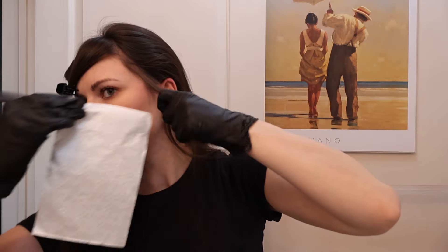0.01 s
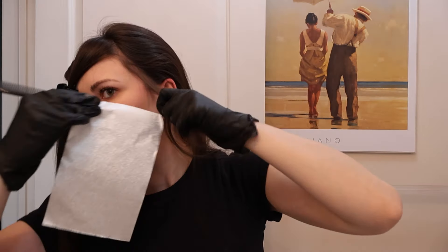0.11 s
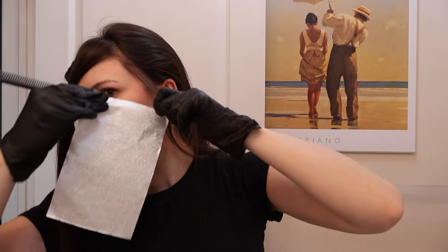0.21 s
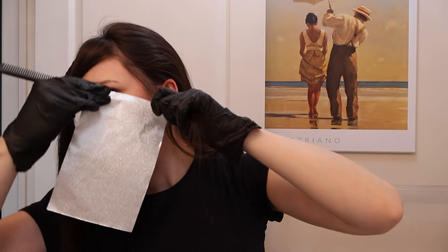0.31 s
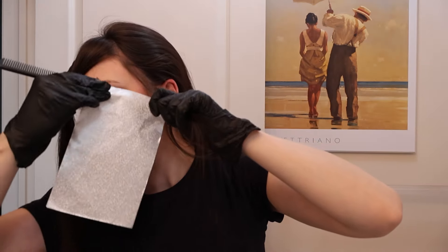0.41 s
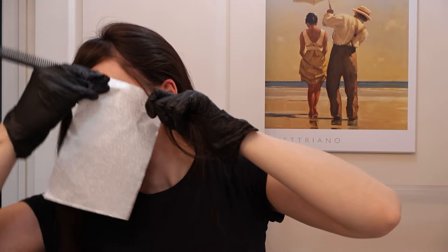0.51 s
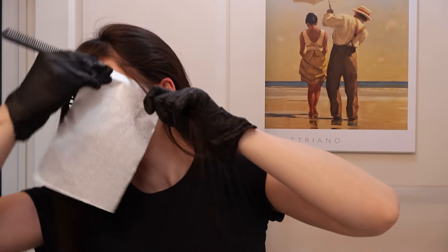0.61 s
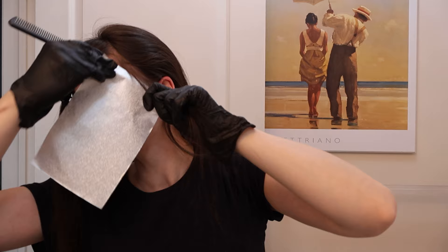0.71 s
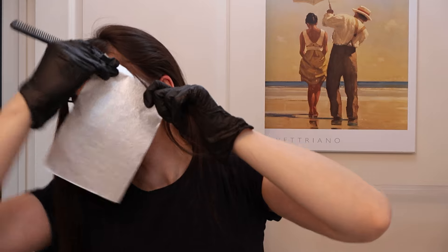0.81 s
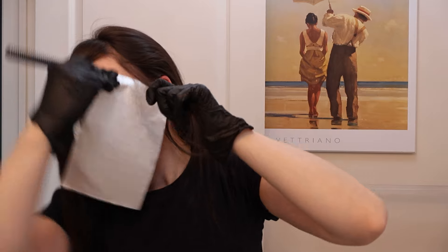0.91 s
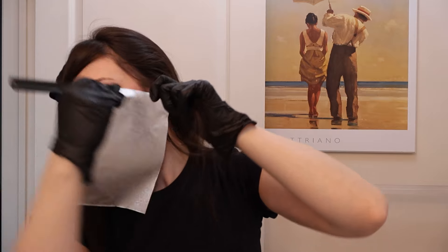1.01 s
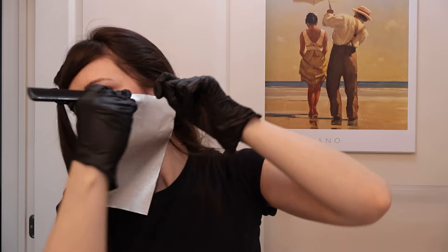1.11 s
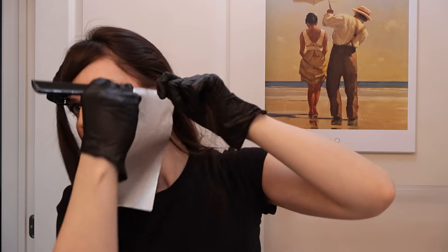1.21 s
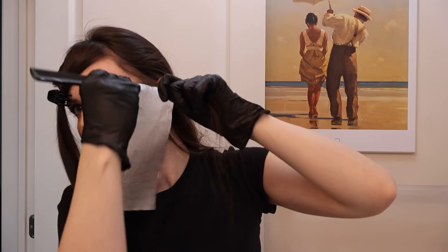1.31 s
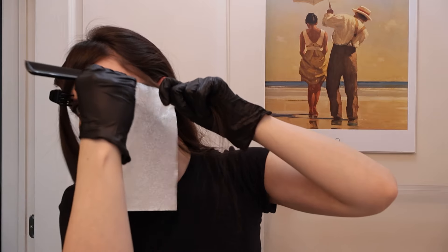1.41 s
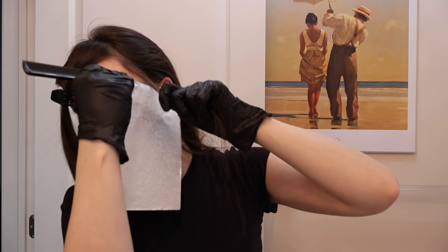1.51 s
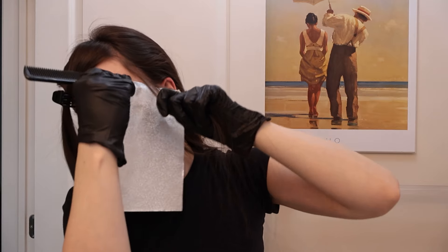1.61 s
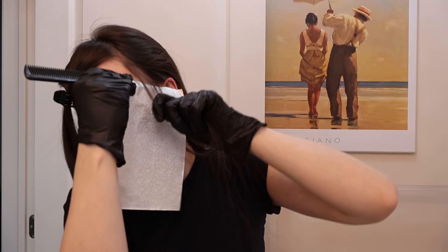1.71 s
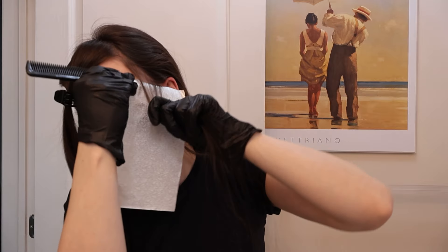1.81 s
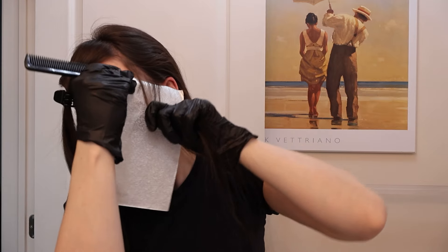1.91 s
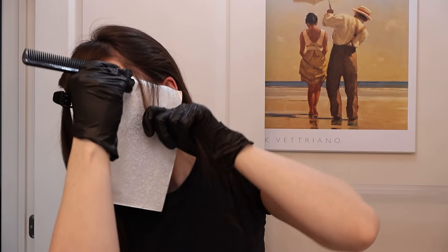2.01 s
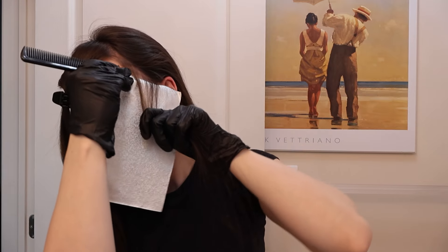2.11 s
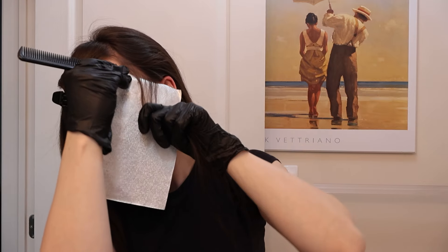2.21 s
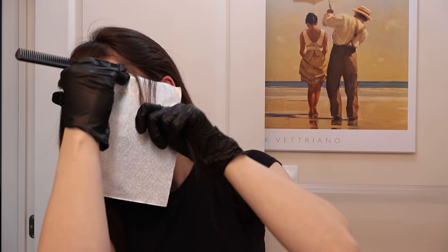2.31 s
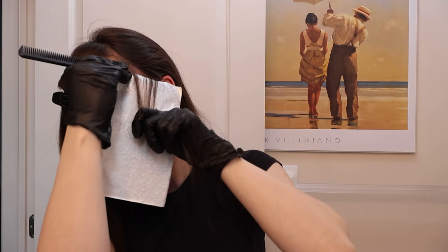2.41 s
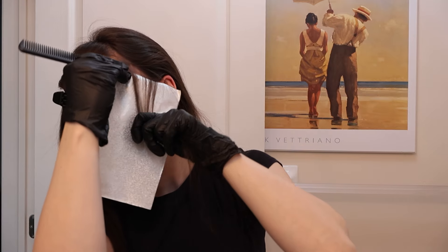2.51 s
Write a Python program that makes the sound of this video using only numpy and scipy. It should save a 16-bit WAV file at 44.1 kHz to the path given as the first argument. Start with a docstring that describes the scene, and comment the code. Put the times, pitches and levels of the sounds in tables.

```python
"""A small bathroom: gloved hands hold a sheet of aluminium foil against the hair, close to a stereo microphone.
Hair, comb and gloves slide over it in hissing strokes and rasps made of tiny random slips. The sheet
crumples in runs of coarser clicks, buckles with sharp pops, ticks under the comb and flaps in low puffs.
Clicks excite the decaying modes of the sheet; hard walls ring briefly around a central sound, over room
tone of filtered noise, widest in the bass, and a low hum."""
import sys
import numpy as np
from scipy import signal
from scipy.fft import rfft, irfft
from scipy.io import wavfile

SR = 44100
rng = np.random.default_rng(int(sys.argv[2]) if len(sys.argv) > 2 else 0)


def master_out(mix):
    """Clip the mix to full scale and print it as 16-bit PCM to the path in sys.argv[1]."""
    frames = np.transpose(np.atleast_2d(mix))
    ceiling = np.clip(frames, -1, 1)
    pcm = np.round(ceiling * 32767).astype(np.int16)
    wavfile.write(sys.argv[1], SR, pcm)


N = 114660  # samples
TIME_S = np.arange(N) / SR
OCTAVES = np.log2(np.maximum(np.arange(N + 1) * SR / (2 * N), 1))  # filter frequency axis, above 1 Hz
TOP_HZ = 15750  # upper limit of the recorder
SLIPS_PER_S, SLIP_SCATTER_DB = 9000, -0.5
CATCH_PER_S, CATCH_DB = 260, 1.8  # slips cluster: rate and depth of their level changes


def undb(db):
    """Decibels to gain."""
    return 10 ** (np.asarray(db) / 20)


def unit(x):
    """Scale to rms 1."""
    return x / np.sqrt(np.mean(x ** 2))


def curve(points):
    """Join (Hz, value) points on the octave axis."""
    hz, value = np.array(points, float).T
    return np.interp(OCTAVES, np.log2(hz), value)


HUMP_SKIRT_DB = 22
TOP_LOSS_DB = 6.5  # per octave, from one octave above the peak


def hump(hz, spread_octaves):
    """A spectral peak in dB with sloping skirts and extra loss in the treble."""
    above = OCTAVES - np.log2(hz)
    skirt = -HUMP_SKIRT_DB * np.log10(1 + (above / spread_octaves) ** 2)
    return skirt - TOP_LOSS_DB * np.maximum(above - 1, 0)


def colour(x, db):
    """Causal (minimum-phase) filter of unit power with the given dB shape."""
    cepstrum = irfft(np.log(unit(undb(db))))
    # Folding the cepstrum onto positive time makes the filter causal.
    cepstrum[1:N] *= 2
    cepstrum[N + 1:] = 0
    response = np.exp(rfft(cepstrum))
    return irfft(rfft(x, 2 * N) * response)[:N]


def walk(per_s):
    """Random values joined by straight lines, spread near 1."""
    at = TIME_S * per_s
    count = int(at[-1]) + 2
    return 1.2 * np.interp(at, np.arange(count), rng.standard_normal(count))


def grains(per_s, scatter_db):
    """Random tiny clicks of uneven size and either sign, rms 1."""
    size = undb(scatter_db * np.minimum(rng.exponential(size=N), 4))
    happens = rng.random(N) < per_s / SR
    return unit(happens * np.sign(rng.standard_normal(N)) * size)


def catching_slips():
    """Stick-slip clicks whose level wanders, so that they catch in clusters."""
    return unit(grains(SLIPS_PER_S, SLIP_SCATTER_DB) * undb(CATCH_DB * walk(CATCH_PER_S)))


TILT_FROM_HZ = 280  # brightness acts above this


def bouts(rows, clicks, shape):
    """Each movement swells, holds and dies away by 20 dB per release time, with its own brightness."""
    out = 0
    tilt_octaves = np.maximum(OCTAVES, np.log2(TILT_FROM_HZ))
    for start, rise, hold, release, db, tilt in rows:
        swell = np.clip((TIME_S - start) / max(rise, 1e-3), 0, 1) ** 0.78
        since_hold = np.maximum(TIME_S - start - rise - hold, 0)
        fade = 10 ** (-since_hold / max(release, 1e-3))
        out = out + undb(db) * colour(clicks * swell * fade, shape + tilt * tilt_octaves)
    return out


# Modes of the foil sheet: pitch_hz [Hz], level_db [dB, before the drive level], t60_s [s to fall 60 dB]
SHEET_MODES = [(700, 2.5, 0.063), (807, -3, 0.074), (1185, -6.5, 0.089), (1375, 0, 0.046),
               (1830, -4.5, 0.23), (2160, -5, 0.044), (2390, -1, 0.092), (2730, 5, .11), (2900, 6.5, 0.084),
               (3300, -4, 0.093), (4870, -19, 0.056)]
FLEX_PER_S, FLEX_S = 50, .00015  # rate and size of the timing wander of the ringing
BEND_DELAY_S = .0014  # scale of the bending-wave delay


def sheet(x, drive):
    """The foil passes treble ahead of bass, as bending waves travel; its modes waver as it flexes."""
    t = np.arange(N // 4) / SR
    ring = 0
    for hz, db, t60 in SHEET_MODES:
        decay = np.log(1000) / t60
        mode = np.exp(-decay * t) * np.cos(2 * np.pi * hz * t)
        ring = ring + undb(db) * 2 * decay / SR * mode
    steady_ringing = signal.fftconvolve(drive, ring)[:N]
    wavering_at = np.arange(N) + FLEX_S * SR * walk(FLEX_PER_S)
    ringing = np.interp(wavering_at, np.arange(N), steady_ringing)
    hz = 2 ** OCTAVES
    # Phase whose slope is a delay falling with the root of frequency, to zero at TOP_HZ.
    turns = BEND_DELAY_S * (2 * np.sqrt(1000 * hz) - hz * np.sqrt(1000 / TOP_HZ))
    return irfft(rfft(x + ringing, 2 * N) * np.exp(-2j * np.pi * turns))[:N]


# Colour of the room's noise: pitch_hz [Hz], density_db [dB per Hz, relative]
ROOM_NOISE_COLOUR = [(15, -25), (25, 0), (146, 0.5), (293, -1), (515, -3), (691, -3.5), (952, -3.5),
                     (1150, -8), (1760, -7), (8780, -8), (15000, -13)]
# Stereo width of the room's noise: pitch_hz [Hz], side_minus_mid_db [dB]
ROOM_NOISE_WIDTH = [(40, -2), (120, -11), (500, -14.5), (1500, -30.5), (5000, -41), (14000, -24)]
ROOM_NOISE_DB = -56
HUM_HZ, HUM_DB = 59.2, -75


def room_tone():
    """Faint steady noise and a low hum; mainly the bass differs between the channels."""
    shape = curve(ROOM_NOISE_COLOUR)
    mid = colour(rng.standard_normal(N), shape)
    side = colour(rng.standard_normal(N), shape)
    side = irfft(rfft(side, 2 * N) * undb(curve(ROOM_NOISE_WIDTH)))[:N]
    hum = undb(HUM_DB) * unit(np.sin(2 * np.pi * HUM_HZ * TIME_S))
    return hum + undb(ROOM_NOISE_DB) * (mid + side * np.array([[1], [-1]]))


# Strokes over the foil: start_s, rise_s, hold_s, release_s [s], level_db [dB, before SLIP_GAIN_DB],
# brightness [dB per octave]
FOIL_STROKES = [(0.0, 0.0011, 0.12, 0.12, -51.5, -1), (0.199, 0.01, 0.0037, 0.015, -33, 1),
                (.224, 0.0036, 0.0058, 0.012, -31.5, 1), (0.488, 0.015, 0.0046, 0.024, -36.5, 2),
                (0.57, 0.017, 0.019, .03, -42, 1), (0.595, 0.03, 0.0078, 0.049, -33.8, 1.5),
                (0.654, 0.04, 0.083, 0.094, -39.5, -0.5), (0.807, 0.012, 0.014, 0.036, -39.5, -1),
                (0.855, 0.041, 0.0098, 0.024, -45.5, -3), (0.933, 0.0083, 0.019, 0.085, -39.5, 1.5),
                (0.994, 0.0083, 0.024, 0.058, -47, 0.5), (1.13, 0.01, 0.004, 0.096, -40.5, -0.5),
                (1.251, 0.061, 0.072, 0.07, -40.5, 0), (1.387, 0.034, 0.0063, 0.076, -31.5, 3),
                (1.482, 0.027, 0.013, 0.038, -34, 1.5), (1.594, 0.023, 0.015, 0.073, -36.5, 3),
                (1.69, 0.019, 0.027, 0.069, -44, 0), (1.756, 0.01, 0.013, 0.091, -43.5, -2),
                (1.836, 0.03, 0.0046, 0.071, -41.5, 1), (1.928, 0.023, 0.019, .03, -53, 0),
                (1.988, 0.01, 0.0092, 0.036, -46.5, -0.5), (2.022, 0.011, 0.11, 0.047, -54.5, -2.5),
                (2.153, 0.024, 0.018, .03, -50.5, -2.5), (2.229, 0.0067, 0.11, 0.026, -55, -1),
                (2.339, 0.051, 0.017, 0.051, -45.5, -1.5), (2.423, 0.034, 0.011, 0.073, -46.5, 0),
                (2.522, 0.034, 0.029, 0.066, -49.5, -0.5)]
# Colour of the sliding hiss: pitch_hz [Hz, before the grip shift], density_db [dB per Hz, relative]
SLIDING_COLOUR = [(100, -27), (400, -8.5), (1000, -8.5), (2000, -5), (3600, -3), (4800, -1), (6200, 0),
                  (7600, -2.5), (8800, 3.3), (10200, -8.5), (13000, -4.5), (16000, -13.5)]
SLIP_GAIN_DB, SLIP_RING_DB = 0.5, -15
GRIP_OCTAVES = .04  # scale of the colour shift from grip to grip


def strokes():
    """Hair and gloves slide in dense slips that catch in clusters; each new grip shifts the resonances."""
    slips = catching_slips()
    shifts = 2 ** (GRIP_OCTAVES * rng.uniform(-1.1, 1, len(FOIL_STROKES)))
    hiss = 0
    for row, shift in zip(FOIL_STROKES, shifts):
        shape = curve(np.array(SLIDING_COLOUR) * [shift, 1])
        hiss = hiss + bouts([row], slips, shape)
    return undb(SLIP_GAIN_DB) * sheet(hiss, undb(SLIP_RING_DB) * hiss)


# Comb teeth on the foil: start_s [s], strength_db [dB, before TICK_GAIN_DB]
COMB_TICKS = [(0.067, -15), (0.2306, 2.5), (0.507, -3.5), (0.9447, -11), (1.7027, -7), (1.7571, -2.5),
              (1.8636, -7.5), (2.009, -11), (2.045, -22)]
TICK_HZ, TICK_OCTAVES, TICK_GAIN_DB = 7000, 1, -8.5
TICK_S = 0.0016  # decay to 1/e


def ticks():
    """A comb tooth flicks off a crease: a very short, bright scratch of decaying noise."""
    flick = sum(undb(db) * (TIME_S > start) * np.exp(-abs(TIME_S - start) / TICK_S)
                for start, db in COMB_TICKS)
    scratch = flick * np.sign(rng.standard_normal(N)) / np.sqrt(TICK_S * SR / 2)
    return undb(TICK_GAIN_DB) * colour(scratch, hump(TICK_HZ, TICK_OCTAVES))


# Runs of small creases: start_s, rise_s, hold_s, release_s [s], level_db [dB, before CREASE_GAIN_DB],
# brightness [dB per octave]
CREASE_RUNS = [(.202, 0.011, 0.019, 0.0053, -39.5, -2), (.227, 0.006, 0.012, 0.022, -34.5, -3.5),
               (.49, 0.015, 0.0062, 0.015, -44.5, -2), (.682, 0.0021, 0.0085, 0.027, -38, 0.5),
               (.725, 0.015, .015, 0.33, -57, -3.5), (.86, .02, 0.14, 0.057, -62.5, -8),
               (1.008, 0.0087, .025, .02, -51.5, -6.5), (1.053, 0.0022, 0.052, 0.017, -38.5, -4.5),
               (1.108, 0.0044, 0.016, 0.068, -37, -0.5), (1.14, 0.0085, 0.0098, 0.089, -41, -2.5),
               (1.255, 0.028, 0.17, .04, -47.5, -0.5), (1.405, 0.061, 0.02, 0.12, -41.5, 0),
               (1.495, 0.019, 0.025, 0.033, -40, -1), (1.545, 0.021, 0.016, 0.085, -39.5, -4),
               (2.076, 0.0033, 0.0099, 0.026, -42, -3.5), (2.165, 0.0043, 0.0093, 0.015, -49, -5),
               (2.382, 0.0062, 0.0068, 0.11, -50.5, -3), (2.524, 0.0043, 0.011, 0.088, -50, -6.5)]
# Colour of the creasing: pitch_hz [Hz], density_db [dB per Hz, relative]
CREASING_COLOUR = [(80, -46), (250, -23), (500, -14), (900, -9), (1300, 0.5), (1750, -6.5), (2400, 2.5),
                   (3800, -3), (6000, -4), (10000, -13.5), (16000, -11)]
CREASES_PER_S, CREASE_SCATTER_DB = 1700, 2
CREASE_GAIN_DB, CREASE_RING_DB = 0.5, -2.5


def crumples():
    """Coarser, sparser clicks as the sheet bends and creases, with more ringing than the strokes."""
    clicks = grains(CREASES_PER_S, CREASE_SCATTER_DB)
    creases = bouts(CREASE_RUNS, clicks, curve(CREASING_COLOUR))
    return undb(CREASE_GAIN_DB) * sheet(creases, undb(CREASE_RING_DB) * creases)


# Single buckles of the sheet: start_s [s], strength_db [dB, before POP_GAIN_DB], pitch_hz [centre, Hz],
# spread [octaves], ring_db [drive of the modes relative to the snap, dB]
BUCKLES = [(0.2031, -8.5, 2500, 1.9, -10), (0.215, -0.5, 7000, 0.87, -4), (.230, 2, 1390, 0.67, 8),
           (0.2416, 0.5, 2110, 0.41, -13), (0.5068, -5.5, 5600, 1.8, 7), (0.6838, -3.5, 2220, 0.45, -4),
           (1.0531, 3, 2730, 1.23, 1), (1.060, -9.5, 2570, .8, 0), (1.109, -0.5, 3010, .8, -10),
           (1.1128, 1.5, 3100, 0.7, -15), (1.166, -1, 2700, 0.45, -6), (1.222, -1.5, 2520, 0.79, 5),
           (1.3068, 1, 2230, 0.71, 5.5), (1.435, -3, 2030, 1.1, -6), (1.522, -8.5, 2630, .9, -6),
           (1.561, -7, 2170, 0.76, -9), (1.577, -7.5, 2000, 0.51, -11), (1.602, -3.5, 2850, 0.3, -3),
           (2.045, -11.5, 4050, 0.84, -5), (2.075, -3.5, 2550, 0.39, -19), (2.082, -7.5, 4160, 0.36, -5)]
POP_GAIN_DB = -10.5
POP_RATTLE_DB, POP_RATTLE_S = 2, .0095  # level against the click, decay to 1/e


def pops():
    """A facet snaps through: one click and a brief rattle, coloured by the facet's size."""
    out, drive = 0, 0
    rattle = grains(SLIPS_PER_S, SLIP_SCATTER_DB)
    for start, db, hz, spread, ring_db in BUCKLES:
        age = np.arange(N) - int(start * SR)
        decay = (age > 0) * np.exp(-abs(age) / SR / POP_RATTLE_S)
        after = decay * rattle / np.sqrt(POP_RATTLE_S * SR / 2)
        burst = (age == 0) + undb(POP_RATTLE_DB) * after
        snap = undb(db) * colour(burst, hump(hz, spread))
        out = out + snap
        drive = drive + undb(ring_db) * snap
    return undb(POP_GAIN_DB) * sheet(out, drive)


# Gloves dragging on the foil: start_s, rise_s, hold_s, release_s [s], level_db [dB],
# pitch_hz [centre, Hz], spread [octaves]
GLOVE_RASPS = [(0.222, 0.0074, 0.0077, 0.02, -43.5, 740, 0.26),
               (0.483, 0.024, 0.0063, 0.016, -42, 2300, 0.19), (0.56, 0.037, 0.046, .05, -55, 2390, 0.064),
               (0.592, 0.029, 0.14, 0.38, -42.5, 5140, 0.34), (0.996, .01, 0.016, .03, -49.5, 1210, 0.33),
               (1.165, .004, 0.011, 0.027, -44, 2900, 0.32), (1.228, .02, 0.027, 0.052, -49.5, 3540, 0.52)]


def rasps():
    """Stick-slip of a glove, each drag heard through one resonance of the sheet."""
    slips = catching_slips()
    out = 0
    for start, rise, hold, release, db, hz, spread in GLOVE_RASPS:
        out = out + bouts([(start, rise, hold, release, db, 0)], slips, hump(hz, spread))
    return out


# The whole sheet flaps against the hair: start_s [s], level_db [dB]
SHEET_FLAPS = [(0.23, -43), (1.056, -64), (1.107, -59), (2.08, -49)]
FLAP_HZ, FLAP_OCTAVES = 350, 5
FLAP_S = 0.0097  # decay to 1/e


def flaps():
    """The harder tugs move the whole sheet: a soft, low puff of decaying noise."""
    push = sum(undb(db) * (TIME_S > start) * np.exp(-abs(TIME_S - start) / FLAP_S)
               for start, db in SHEET_FLAPS)
    return colour(push * rng.standard_normal(N), hump(FLAP_HZ, FLAP_OCTAVES))


# Decay of the tail between the walls: pitch_hz [Hz], t60_s [s to fall 60 dB]
WALL_DECAY = [(200, 0.59), (1500, 0.37), (2600, 0.32), (4500, 0.28), (8000, 0.25), (15000, 0.23)]
EARLY_DB, EARLY_T60_S, TAIL_DB = -5, 0.032, -5.5  # levels against the direct sound
HAND_MOVE_S, ROOM_LENGTH_S = .06, .45  # spacing of the echo patterns, length of each


def bathroom(x):
    """Direct sound, near reflections and a short tail; the echo pattern changes as the hands move."""
    t = np.arange(int(ROOM_LENGTH_S * SR)) / SR
    size = len(t)
    hz = np.maximum(np.arange(size // 2 + 1) * SR / size, 1)
    band_hz, t60 = np.array(WALL_DECAY).T
    # Overlapping bands, so that each frequency blends the decays of its neighbours.
    shares = np.array([np.interp(np.log(hz), np.log(band_hz), row) for row in np.eye(len(t60))])
    late = np.exp(-np.log(1000) * t / t60[:, None]) * np.minimum(t / 0.016, 1)
    early = (t > .0015) * np.exp(-np.log(1000) * t / EARLY_T60_S)
    out = np.zeros(N + size)
    for centre in np.arange(0, N / SR + HAND_MOVE_S, HAND_MOVE_S):
        away = (TIME_S - centre) / HAND_MOVE_S
        near = np.flatnonzero(abs(away) < 1)
        tail = (irfft(rfft(rng.standard_normal(size)) * shares, size) * late).sum(axis=0)
        reflections = unit(rng.standard_normal(size) * early)
        walls = undb(EARLY_DB) * reflections + undb(TAIL_DB) * unit(tail)
        faded = x[near] * np.cos(np.pi / 2 * away[near])  # equal-power crossfade
        echo = signal.fftconvolve(faded, walls / np.sqrt(size))
        out[near[0]:near[0] + len(echo)] += echo
    return (x + out[:N]) / np.sqrt(1 + undb(EARLY_DB) ** 2 + undb(TAIL_DB) ** 2)


def scene():
    """The foil in the bathroom, over the room tone."""
    tone = room_tone()
    foil = strokes() + ticks() + crumples() + pops() + rasps() + flaps()
    return bathroom(foil) + tone


def record(dry):
    """The recorder cuts the top with a steep low-pass."""
    low_pass = signal.ellip(12, .1, 85, TOP_HZ, fs=SR, output="sos")
    return signal.sosfilt(low_pass, dry)


dry = scene()
out = record(dry)
master_out(out)
```